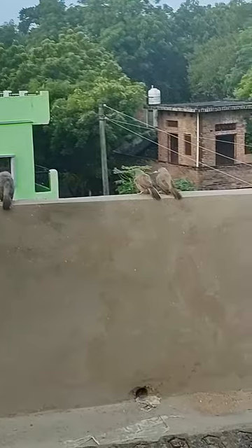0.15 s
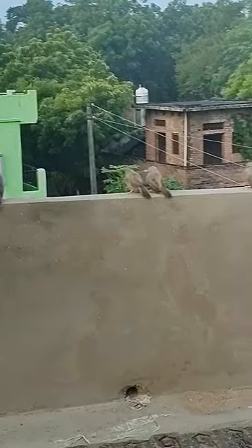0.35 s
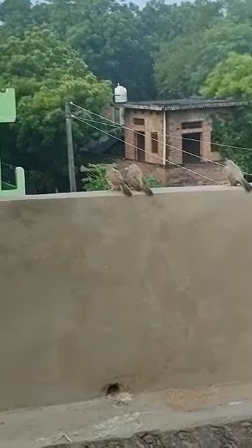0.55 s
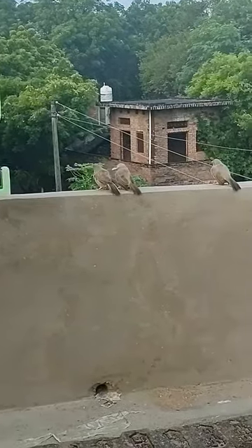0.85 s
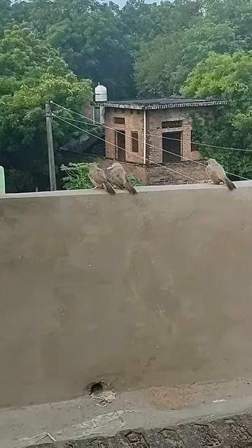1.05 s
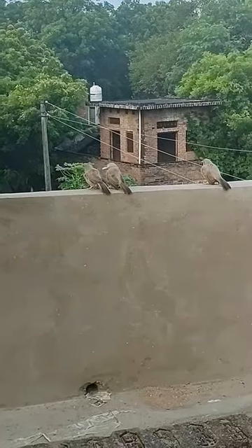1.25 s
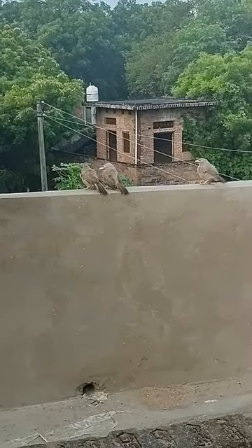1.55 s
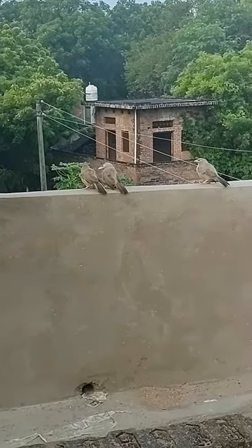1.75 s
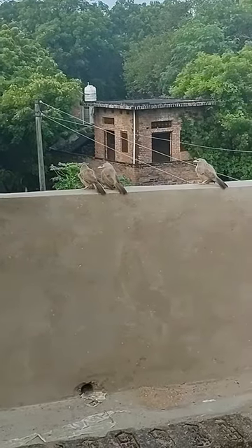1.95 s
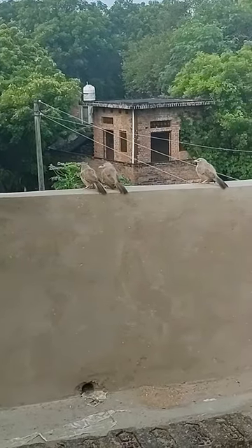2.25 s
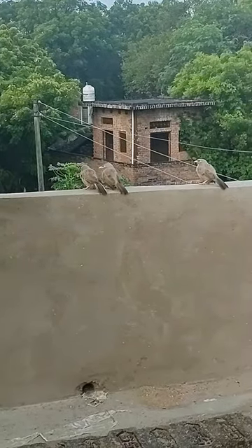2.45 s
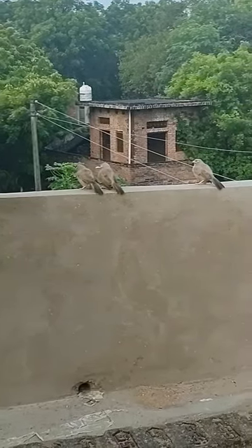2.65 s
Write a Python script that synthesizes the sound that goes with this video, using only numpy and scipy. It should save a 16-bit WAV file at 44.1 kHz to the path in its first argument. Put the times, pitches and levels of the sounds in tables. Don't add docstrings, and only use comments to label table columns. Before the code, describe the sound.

Bird calls: brisk high chirps repeating steadily, a lower slurred burst near one second, soft outdoor hum

```python
import sys
import numpy as np
from scipy import signal
from scipy.io import wavfile
from scipy.ndimage import uniform_filter1d

SR = 44100
rng = np.random.default_rng(int(sys.argv[2]) if len(sys.argv) > 2 else 0)


def generate_wav(sig):
    pcm = np.round(np.clip(np.atleast_2d(sig).T, -1, 1) * 32767).astype(np.int16)
    wavfile.write(sys.argv[1], SR, pcm)


def level_to_linear(level):
    exponent = np.asarray(level, float) / 20
    return 10 ** exponent


N = 123479

# frequency in Hz, density in dB per Hz.
LEAF_SPECTRUM = [(710, -29), (1200, -28.5), (3020, -2), (3560, -6.5), (3830, -1.5), (5690, -4.5),
                 (6170, -2), (7460, -9.5), (8580, -46.5), (11200, -64), (18900, -120)]


def evened(x):
    return x / np.sqrt(np.mean(x ** 2) + 1e-20)


def add(mix, s, sound):
    part = mix[round(s * SR):][:len(sound)]
    part += sound[:len(part)]


def along(points):
    t, v = np.transpose(points)
    return np.interp(np.arange(N) / SR, t, v)


def resonate(x, hz, width):
    turn = np.exp(2j * np.pi * hz * np.arange(len(x)) / SR)
    r = np.exp(-np.pi * width / SR)
    return 2 * (turn * signal.lfilter([1 - r], [1, -r], x / turn)).real


def hiss(points, patchy_db):
    frames = N // 256 + 5
    f, db = np.transpose(points)
    hz = np.fft.rfftfreq(1024, 1 / SR)
    a, b, p = rng.standard_normal((frames, 513, 3)).T
    patches = uniform_filter1d(p, size=10, axis=0)
    patches = evened(uniform_filter1d(patches, size=10, axis=1))
    spectrum_db = np.interp(np.log(hz + 1), np.log(f + 1), db)[:, None]
    z = (a + 1j * b) * level_to_linear(spectrum_db + patchy_db * patches)
    return evened(signal.istft(z, nperseg=1024, noverlap=768)[1][:N])


def whistle(length, from_hz, to_hz, db, peak, round_, bend, wobble_db):
    u = np.arange(0, length, 1 / SR) / length
    noise = uniform_filter1d(rng.standard_normal((2, 20000)), size=180, axis=1)
    waver, wobble = noise[:, :len(u)] * np.sqrt(180)
    hz = (from_hz + (to_hz - from_hz) * u ** bend) * (1 + 0.005 * waver)
    swell = np.sin(np.pi * u ** (np.log(.5) / np.log(peak))) ** round_
    phase = 2 * np.pi * np.cumsum(hz) / SR
    return np.sqrt(2) * level_to_linear(db + wobble_db * wobble) * swell * np.sin(phase)


def whistlers(table, peak, round_, bend, wobble_db):
    out = np.zeros(N)
    for s, *row in table:
        add(out, s, whistle(*row, peak, round_, bend, wobble_db))
    return out


def singer():
    # start in seconds from the falling note, length in seconds, from Hz, to Hz, relative level in dB.
    notes = [
        (-.105, .045, 3950, 3800, -4),
        (-.063, .024, 3790, 3810, 4.5),
        (-.04, .03, 4150, 4380, 0.5),
        (-.014, .021, 5680, 4800, 1.5),
        (.02, .022, 4290, 4290, -4),
        (0.012, 0.026, 5830, 6200, -4.5),
        (0.031, 0.02, 6120, 6420, 6),
        (.049, 0.016, 6250, 6330, -9),
        (.004, .013, 4960, 4830, -7),
    ]
    shapes = [(.4, .7, .8), (.6, .9, 1.1), (.68, 1.1, .7), (.62, 1.5, 2.1), (.5, .9, 1), (.75, .9, 1),
              (.55, 1.4, .7), (.5, .8, .8), (.4, .8, .6)]
    voices = (0, 0, 1, 2, 1, 3, 3, 3, 2)
    # time in seconds, then levels in dB of the low, middle, falling and rising notes.
    phrases = [(.211, -50, -53.5, -59, -47), (.492, -62.5, -53.5, -44, -44), (.778, -67.5, -57, -47, -52),
               (1.061, -65, -57, -45, -51), (1.346, -62, -58.5, -47.5, -44),
               (1.627, -67.5, -54.5, -48, -48), (1.918, -65, -53, -48, -55), (2.212, -65, -55, -50, -49),
               (2.494, -62.5, -52.5, -51, -53), (2.787, -61.5, -57, -50.5, -53)]
    out = np.zeros(N)
    for s, *level in phrases:
        for (at, length, hz0, hz1, db), (peak, round_, bend), k in zip(notes, shapes, voices):
            add(out, s + at, whistle(length, hz0, hz1, db + level[k], peak, round_, bend, wobble_db=1.6))
    return out


def chipper():
    # start in seconds, level in dB.
    chips = [(1.465, -67.5), (1.608, -64), (1.773, -65), (1.906, -64.5), (2.077, -65), (2.212, -63.5),
             (2.39, -65), (2.698, -68)]
    out = np.zeros(N)
    for s, db in chips:
        add(out, s, whistle(.035, 7080, 5700, db, .45, round_=.6, bend=1.2, wobble_db=.8))
    return out


def near_whistler():
    # start in seconds, length in seconds, from Hz, to Hz, level in dB.
    notes = [(.682, 0.033, 4020, 3600, -53), (.729, 0.029, 3140, 3155, -41),
             (.912, 0.029, 3300, 3010, -47.5), (.711, .006, 3500, 3200, -54), (.72, .006, 3250, 3050, -52),
             (.757, .03, 3160, 3130, -54), (.788, .03, 3150, 3140, -59), (.664, .014, 4080, 3900, -62),
             (.948, .016, 4050, 3850, -61), (1.118, .008, 3100, 2850, -54), (1.243, .018, 2080, 2060, -61),
             (.998, 0.012, 3150, 2650, -46), (1.068, 0.027, 3150, 3230, -57), (1.084, .03, 2120, 2130, -60)]
    return whistlers(notes, .65, round_=.35, bend=1.3, wobble_db=.28)


def slurs():
    # time in seconds, pitch in Hz, level in dB.
    calls = [
        [(.785, 2843, -60.5), (.797, 2905, -54), (.812, 2930, -52), (.86, 2630, -58.5), (.865, 2720, -56),
         (.873, 2696, -41), (.895, 2500, -45), (.902, 2450, -39), (.905, 2470, -52)],
        [(1.006, 2246, -59), (1.016, 2340, -44), (1.03, 2430, -35), (1.033, 2283, -54), (1.039, 2130, -48),
         (1.054, 2130, -52), (1.066, 2076, -65)],
        [(1.096, 3200, -62), (1.1, 3100, -41), (1.104, 3000, -54), (1.108, 2700, -40), (1.111, 2520, -48),
         (1.122, 2470, -41), (1.133, 2390, -33), (1.141, 2250, -48), (1.152, 2150, -48)],
        [(1.146, 2454, -60), (1.154, 2398, -37), (1.158, 2120, -52), (1.161, 2076, -39), (1.166, 2070, -43),
         (1.186, 2060, -39), (1.191, 1987, -58), (1.196, 1990, -68)],
    ]
    out = np.zeros(N)
    for call in calls:
        s, hz, db = np.transpose(call)
        t = np.arange(s[0], s[-1], 1 / SR)
        pitch = uniform_filter1d(np.interp(t, s, hz), size=90)
        level = uniform_filter1d(np.interp(t, s, level_to_linear(db)), size=90)
        tone = np.sin(2 * np.pi * np.cumsum(pitch) / SR)
        add(out, s[0], np.sqrt(2) * level * signal.windows.tukey(len(t), .08) * tone)
    return out


def far_whistlers():
    # start in seconds, length in seconds, from Hz, to Hz, level in dB.
    notes = [(.233, 0.011, 2690, 2475, -54.5), (.27, 0.045, 2410, 2420, -60),
             (.275, 0.095, 2190, 2420, -59), (.32, 0.036, 2780, 2420, -58), (.355, .03, 2640, 2450, -60),
             (.285, .045, 2960, 2980, -66), (.28, .045, 2590, 2640, -67), (2.39, .075, 2420, 2270, -75),
             (1.775, .03, 3480, 3420, -60), (.43, .085, 1200, 1420, -63), (.55, .1, 1140, 1430, -65),
             (.39, .04, 1220, 1250, -70), (.51, .05, 1380, 1450, -72), (.65, .05, 1480, 1720, -72),
             (1.597, 0.047, 2583, 2325, -58), (1.706, 0.02, 1650, 2446, -64),
             (1.722, 0.042, 2500, 2330, -63), (1.778, 0.043, 2160, 1850, -63),
             (1.728, 0.04, 3500, 3280, -55), (1.76, 0.038, 3310, 3240, -51), (1.797, .025, 3290, 3200, -60),
             (1.898, 0.054, 2790, 2524, -48.5), (1.945, 0.03, 2420, 2230, -57),
             (1.96, .025, 2350, 1950, -62), (1.885, .014, 2560, 2600, -62), (2.093, .02, 2160, 1980, -63),
             (.375, .045, 2050, 1600, -68), (1.93, 0.032, 2725, 2600, -53.5),
             (1.97, 0.027, 2023, 1830, -62.5), (2.04, 0.031, 2476, 2040, -59.5),
             (2.055, 0.039, 2093, 1988, -62.5), (2.092, 0.057, 1966, 1850, -62.5),
             (.265, 0.04, 1960, 2120, -65), (.305, 0.035, 4150, 4750, -66), (.252, 0.015, 5420, 4645, -57),
             (2.775, 0.021, 1890, 1743, -73)]
    return whistlers(notes, .45, round_=.5, bend=1, wobble_db=1.2)


def wall():
    # start in seconds, level in dB, ringing frequency in Hz.
    ticks = [(0.429, -64.5, 4700), (1.186, -52.5, 4400), (1.242, -63, 3900), (1.211, -59, 4570),
             (1.441, -62, 3900), (1.812, -52.5, 4900), (1.096, -59, 3650), (1.2, -61, 4600),
             (1.224, -62, 4700), (.678, -64, 3000), (1.19, -64, 7600), (1.243, -60, 7500),
             (1.252, -61, 7300)]
    tick_s = .0025
    out, t = np.zeros(N), np.arange(N) / SR
    for s, db, hz in ticks:
        u = t[:400]
        ring = evened(resonate(resonate(rng.standard_normal(400), hz, 700), hz, 700))
        add(out, s, level_to_linear(db) * u / tick_s * np.exp(1 - u / tick_s) * ring)
    start_s, length_s, rustle_db, rustle_hz, width_hz = 1.215, 0.3, -62.5, 7300, 2000
    unevenness = evened(uniform_filter1d(rng.standard_normal(N), size=150))
    grains = rng.standard_normal(N) * level_to_linear(2.6 * unevenness)
    shape = np.sin(np.pi * np.clip((t - start_s) / length_s, 0, 1) ** .8) ** 0.4
    rustle = evened(resonate(resonate(grains, rustle_hz, width_hz), rustle_hz, width_hz))
    return out + level_to_linear(rustle_db) * shape * rustle


def dove():
    # start in seconds, length in seconds, from Hz, to Hz, level in dB.
    coos = [
        (.535, .07, 470, 600, -72),
        (.65, 0.11, 570, 460, -69),
        (1.58, 0.41, 605, 527, -68.5),
        (2.29, .19, 600, 505.7, -71.5),
    ]
    return whistlers(coos, .55, round_=.3, bend=3, wobble_db=1.5)


def trees(x, tail_db, echo_db):
    # delay in seconds, level in dB.
    echoes = [
        (.0055, -7.5),
        (.03, -12.5),
        (0.057, -21),
        (.09, -13.5),
    ]
    t60_s, near_t60_s, near_db, sway_per_s = 0.55, .12, 2.5, 1.3
    taps = np.zeros((2, SR))
    at = np.arange(300, SR - 20, 20)
    at_random = at + rng.integers(0, 20, (2, len(at)))
    np.put_along_axis(taps, at_random, rng.choice([-1., 1.], (2, len(at))), axis=1)
    t = np.arange(SR) / SR
    taps *= level_to_linear(-60 * t / t60_s) + level_to_linear(near_db - 60 * t / near_t60_s)
    taps *= level_to_linear(tail_db) / np.linalg.norm(taps[0])
    sway = 2 * np.pi * sway_per_s * np.arange(N) / SR
    swayed = x * np.array([np.cos(sway), np.sin(sway)])
    out = x + signal.fftconvolve(swayed, taps, axes=1)[:, :N].sum(axis=0)
    for s, db in echoes:
        add(out, s, level_to_linear(db + echo_db) * x)
    return out


def thrum():
    start_s, hz, db, rise_s, fall_s = .236, 100, -52, 0.1, 0.14
    u = np.maximum(np.arange(N) / SR - start_s, 0)
    rise = np.minimum(u / rise_s, 1) ** 0.42
    fall = np.exp(-(np.maximum(u - rise_s, 0) / fall_s) ** 1.4)
    return level_to_linear(db) * rise * fall * np.sin(2 * np.pi * hz * u)


def town():
    # frequency in Hz, density in dB per Hz.
    rumble = [(15, -58.5), (25, -30), (81, -3.5), (226, -5.5), (271, -1.5), (363, -6.5), (453, -2.5),
              (1220, -13.5), (2000, -13), (2600, -52), (4400, -120)]
    # time in seconds, level in dB.
    passing = [(.25, -62.5), (1.14, -63.5), (1.19, -58.5), (1.24, -64), (1.95, -66), (2.3, -71),
               (2.8, -71.5)]
    # frequency in Hz, width in Hz, level in dB.
    hums = [(99, 11, -77.5), (153.5, 14, -74), (226, 4.2, -74)]
    level = along(passing)
    drone = sum(level_to_linear(db) * evened(resonate(rng.standard_normal(N), hz, w)) for hz, w, db in hums)
    return level_to_linear(level - 0.68) * hiss(rumble, patchy_db=1.5) + level_to_linear(level + 67) * drone


def leaves():
    # time in seconds, relative level in dB.
    breeze = [(.24, -1), (1.3, 1.5), (2.8, -4)]
    return level_to_linear(-63.3 + along(breeze)) * hiss(LEAF_SPECTRUM, patchy_db=2.2)


def far_chatter():
    # time in seconds, level in dB.
    flock = [(.24, -72), (1.5, -73), (2.0, -76), (2.3, -90), (2.8, -90)]
    hz, width_hz = 3020, 600
    chatter = resonate(resonate(hiss(LEAF_SPECTRUM, patchy_db=4.0), hz, width_hz), hz, width_hz)
    return level_to_linear(along(flock)) * evened(chatter)


def scene():
    mix = trees(singer() + chipper(), tail_db=-8, echo_db=-8.9)
    mix += trees(near_whistler() + slurs(), tail_db=-13.5, echo_db=-10)
    mix += trees(far_whistlers() + wall(), tail_db=-4.5, echo_db=-4.5)
    mix += dove() + thrum()
    mix += town() + leaves() + far_chatter()
    return np.array([mix, mix])


def top_cut(x):
    return signal.sosfilt(signal.butter(12, 8730, fs=SR, output="sos"), x)


def record(dry):
    edge_hz, start_s, fade_in_s, noise_db = 8090, 0.2314, 0.004, -99
    low_pass = signal.firwin(161, edge_hz, window=("kaiser", 7), fs=SR)
    x = signal.oaconvolve(dry, low_pass[None], "same")
    on = np.clip((np.arange(N) / SR - start_s) / fade_in_s, 0, 1)
    noise = level_to_linear(noise_db) * (on > 0) * rng.standard_normal(N)
    return top_cut(x * on + noise)


dry = scene()
out = record(dry)
generate_wav(out)
```